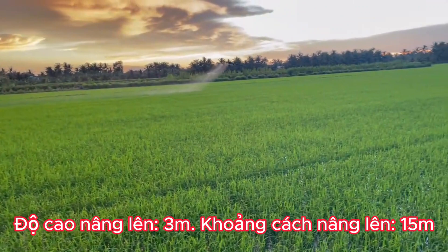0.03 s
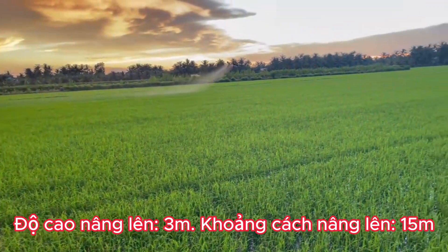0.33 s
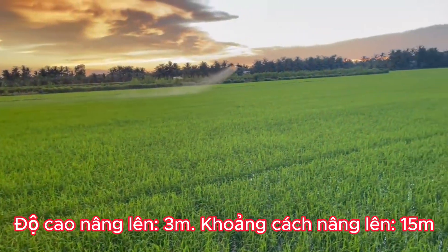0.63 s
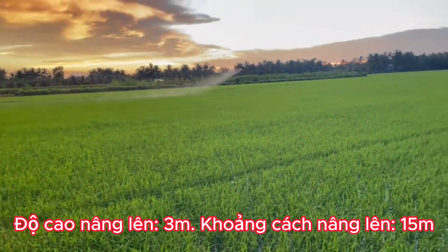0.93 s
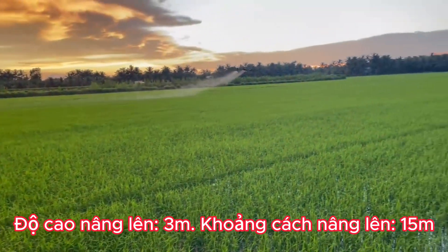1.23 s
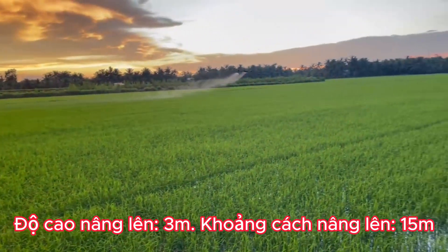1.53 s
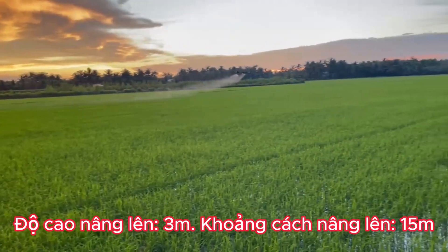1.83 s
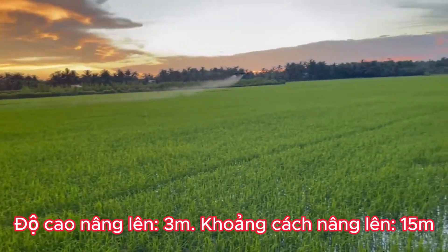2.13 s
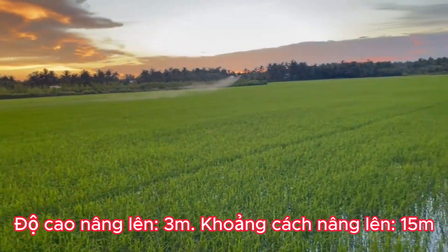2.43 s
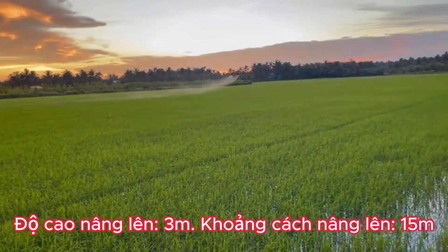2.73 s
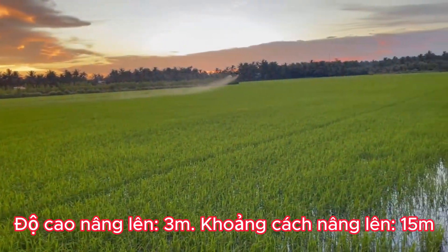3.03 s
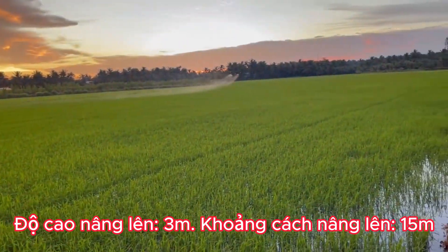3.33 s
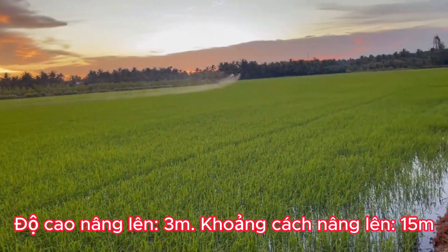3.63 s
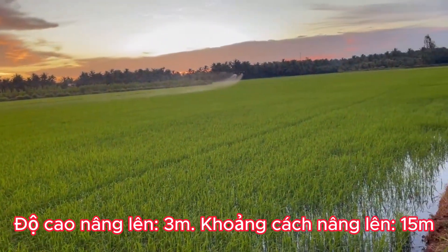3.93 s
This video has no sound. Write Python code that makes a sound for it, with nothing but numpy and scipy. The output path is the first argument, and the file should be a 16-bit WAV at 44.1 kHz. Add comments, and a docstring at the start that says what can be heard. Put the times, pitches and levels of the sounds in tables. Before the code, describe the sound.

A large crop-spraying drone buzzes throughout the four seconds, heard from a distance over an open field. Its rotors thrum and chop, beating against each other above a low air rumble, thin hiss and very faint motor whine. Small blade slaps cluster in the first second and again around three seconds. The pitch sags slightly between about half a second and two seconds, then wavers as the buzz eases a little.

```python
"""A thrumming, chopping buzz: a large crop-spraying drone works far out over a wet rice field,
easing off as it moves away. The leading rotor pulses and tears the air once per blade pass,
and now and then slaps through a tip vortex; slower rotors beat against it.
The field's reflection combs the swish and slaps. Behind them sit a low rumble of downwash,
a thin hiss and a faint motor whine."""
import sys
import numpy as np
from scipy.fft import rfft, irfft, next_fast_len
from scipy.io import wavfile
from scipy.ndimage import map_coordinates

SR = 44100
rng = np.random.default_rng(int(sys.argv[2]) if len(sys.argv) > 2 else 0)


def int16_out(signal):
    """Quantize to a 16-bit WAV file."""
    q = np.round(np.clip(np.atleast_2d(signal).T, -1, 1) * 32767)
    wavfile.write(sys.argv[1], SR, q.astype(np.int16))


N = 176400

# speed of the leading rotor (time [s], blade rate [Hz])
LEAD_SPEED = [(0.0, 56.08), (0.3, 58.0), (0.55, 57.41), (0.8, 55.82), (1.1, 54.85), (1.4, 53.11),
              (1.65, 51.57), (1.9, 51.07), (2.1, 52.91), (2.3, 50.83), (2.55, 52.52), (2.85, 50.83),
              (3.05, 52.58), (3.2, 54.01), (3.45, 51.27), (3.7, 52.74), (4.0, 52.38)]
# faders for the thrum (time [s], body [relative dB], overtones [relative dB])
THRUM_FADERS = [(0.0, -54, -38.5), (0.2, -37, -37), (0.5, -32.5, -33.5), (0.7, -34.5, -34), (1.1, -32, -38),
                (1.25, -39, -38), (1.48, -29.5, -40), (1.8, -35.5, -42.5), (2.05, -41, -45),
                (2.25, -34, -44), (2.5, -37.5, -43), (2.9, -31.5, -42.5), (3.2, -36.5, -43),
                (3.38, -36.5, -42), (3.55, -32.5, -44), (3.8, -41, -43.5), (4.0, -29.5, -39.5)]
# body of the thrum, its lowest overtone and its top (harmonic [x blade rate], level [relative dB])
BODY_HARMONICS = [(1, -23), (2, 0)]
THIRD_HARMONIC = [(3, -8)]
TOP_HARMONICS = [(6, -14), (7, -19), (8, -20.5)]
# rides on the middle harmonics (time [s], fourth [relative dB], fifth [relative dB])
MIDDLE_FADERS = [(0, -4, -7), (.5, -22, -8), (1, -2.5, -7.5), (1.5, -1.5, -3.5), (2.1, -6.5, -7.5),
                 (2.8, -4.5, -12), (3.3, -6.5, -6), (4, -1.5, -10)]
def lead_thrum():
    """A pressure pulse follows each blade of the leading rotor; it dulls and blurs with distance."""
    body_db, overtone_db = curves(THRUM_FADERS)
    fourth_db, fifth_db = curves(MIDDLE_FADERS)
    passes = blade_passes(LEAD_SPEED) - .15
    t = np.arange(N) / SR
    smear = .2 + .14 * t
    third = harmonics(passes, THIRD_HARMONIC, flutter_db=6, smear=smear, rate=13)
    fourth = amp(fourth_db) * harmonics(passes, [(4, 0)], flutter_db=1.5, smear=smear, rate=9)
    fifth = amp(fifth_db) * harmonics(passes, [(5, 0)], flutter_db=2.5, smear=smear, rate=12)
    top = harmonics(passes, TOP_HARMONICS, flutter_db=4, smear=1.47 * smear, rate=20)
    top *= amp(-t)  # sinks 1 dB a second against the other overtones
    body = harmonics(passes, BODY_HARMONICS, flutter_db=1.5, smear=.31, rate=20)
    return amp(body_db - 3) * body + amp(overtone_db - 4) * (third + fourth + fifth + top)


# faders for the swish (time [s], chop and rasp [relative dB], fizz [relative dB])
SWISH_FADERS = [(0.0, -40, -44), (0.35, -39, -43), (0.65, -40, -44), (0.85, -43.5, -44), (1.0, -40.5, -46),
                (1.3, -46, -45), (1.5, -42, -44.5), (1.8, -42.5, -43.3), (1.95, -41.5, -45),
                (2.38, -45, -45.5), (2.52, -42, -46), (2.68, -43.5, -47.5), (2.85, -42.5, -45),
                (3.04, -45, -49.5), (3.18, -39.5, -45.5), (3.35, -44, -48), (3.8, -44.5, -46),
                (4.0, -42.5, -45.5)]
# EQ of the midrange chop and the brighter fizz (frequency [Hz], gain [dB])
CHOP_EQ = [(200, -17), (400, -0.5), (600, -4.5), (780, 5), (1300, 0), (1490, -11.5), (1700, -2.5),
           (1980, -3), (2130, -16.5), (2420, -0.5), (2650, -4.5), (2850, -18), (3100, -10), (3400, -14),
           (4100, -11.5), (6000, -37.5), (10000, -21.5), (16000, -68)]
FIZZ_EQ = [(600, -24), (1480, 0), (1700, 4.5), (1980, -2), (2130, -2), (2380, 4.5), (2620, 1.5), (2850, 0),
           (3080, 4), (3420, 1.5), (3950, 1.5), (4600, -5.5), (5100, 0), (5600, -11), (6200, -4),
           (8000, -24), (12000, -23.5), (16000, -68)]
def blade_swish():
    """The advancing blade rasps and air tears off it in a chop, with a softer fizz on top."""
    chop_db, fizz_db = curves(SWISH_FADERS)
    passes = blade_passes(LEAD_SPEED)
    chop = stereo_noise(CHOP_EQ, strokes(passes, rise=.32, fall=.32, floor=.33, scatter_db=1.6))
    fizz = stereo_noise(FIZZ_EQ, strokes(passes, rise=.23, fall=.18, floor=1.1, scatter_db=3.5))
    rasp = blade_rasp(passes)
    return amp(chop_db - 5) * chop + amp(fizz_db - 4) * fizz + amp(chop_db - 6.3) * rasp


def blade_rasp(passes, eddies=7, spread_passes=.155, cutoff_hz=3600):
    """Each blade meets the same drifting eddies: a bunch of spikes that repeats as a buzz."""
    spikes = np.zeros(N)
    for k, place in enumerate(np.linspace(-1.4, 1.4, eddies)):
        offset = spread_passes * (place + .4 * wobble(4))
        hits = np.diff(np.floor(passes + offset), prepend=0) > 0
        weight = (-1) ** k * np.exp(-place ** 2 / 2)
        spikes += weight * amp(2.1 * wobble(15)) * hits
    return unit(filtered(spikes, lambda hz: amp(along(CHOP_EQ, hz)) / np.hypot(1, (hz / cutoff_hz) ** 2)))


# cue list of slaps (time [s], knock [relative dB], snap [relative dB])
SLAP_CUES = [(0.069, -27.5, -48), (0.0845, -30, -49), (0.1405, -34, -59), (0.176, -26.5, -50),
             (0.2273, -34, -41), (0.332, -35, -38.5), (0.3477, -32, -38), (0.503, -37, -42),
             (0.5753, -31, -46), (0.5905, -33, -40), (0.6613, -31.5, -42), (0.6967, -30, -47),
             (0.9666, -29.5, -42), (1.0944, -27.5, -42), (1.3876, -35, -45), (1.503, -44, -50),
             (2.2957, -30, -58), (2.5072, -36, -41.5), (2.7393, -35, -53), (2.8727, -31, -48),
             (2.971, -43, -44.5), (3.088, -44, -46), (3.1453, -39, -41), (3.160, -30, -51),
             (3.179, -42, -50), (3.2325, -34, -44), (3.2504, -35, -48), (3.960, -35, -42),
             (3.980, -53, -39.5)]
# hollow EQ of the knock (frequency [Hz], gain [dB])
KNOCK_EQ = [(100, -4), (400, -14), (800, 18.5), (1200, 9.5), (1500, -7), (2600, -10), (5000, -9),
            (8000, -43)]
def blade_slaps(snap_s=.0025):
    """Now and then a blade cuts a tip vortex: a hollow knock and a bright snap."""
    t = np.arange(N) / SR
    impulses, snap_gate = np.zeros((2, N))
    for time, knock_db, snap_db in SLAP_CUES:
        impulses[int(time * SR)] = -amp(knock_db + 15.5)
        snap_gate += amp(snap_db) * np.exp(-((t - time) / snap_s) ** 2)
    knocks = filtered(impulses, lambda hz: amp(along(KNOCK_EQ, hz)))
    return knocks + snap_gate * stereo_noise(FIZZ_EQ)


# speeds of the two slower rotors (time [s], blade rate [Hz])
SECOND_SPEED = [(0, 51.6), (.7, 50.2), (1.2, 43), (1.8, 40.4), (2.6, 37), (3.2, 45), (4, 45.3)]
THIRD_SPEED = [(0, 32.74), (1, 32.16), (1.8, 35), (2.3, 43), (2.9, 43.83), (3.4, 34.19), (4, 31.77)]
# timbre of their hum (harmonic [x blade rate], level [relative dB])
HUM_HARMONICS = [(2, -0.5), (3, -5.5), (4, -8), (5, -12), (6, -17.5), (7, -15), (8, -17.5)]
# their shared fader (time [s], level [relative dB])
HUM_FADER = [(0, -40.5), (.6, -38), (1.2, -49.5), (1.9, -43), (2.6, -40), (3.2, -42), (4, -47.5)]
def slow_rotors():
    """Two other rotors hum lower and beat against the leader."""
    second = harmonics(blade_passes(SECOND_SPEED), HUM_HARMONICS, flutter_db=2.5, smear=.82, rate=7)
    third = harmonics(blade_passes(THIRD_SPEED), HUM_HARMONICS, flutter_db=.5, smear=.35, rate=8.1)
    return amp(curves(HUM_FADER)[0]) * (amp(-2) * second + amp(-8) * third)


# bounce off the field (time [s], delay [ms], gain [x direct sound])
FIELD_BOUNCE = [(0, 0.93, 0.36), (.35, 0.89, 0.33), (.55, 0.88, 0.42), (1.4, 0.9, 0.29), (1.75, 0.87, 0.44),
                (2.5, 0.77, 0.33), (3, 0.713, 0.6), (3.4, 0.69, 0.67), (4, 0.67, 0.54)]
def field_reflection(direct):
    """The wet field adds a copy whose delay shrinks with distance: a slowly sweeping comb."""
    n = np.arange(N)
    delay_ms, gain = curves(FIELD_BOUNCE)
    bounce = np.array([np.interp(n - delay_ms * SR / 1000, n, channel) for channel in direct])
    return (direct + gain * bounce) / np.hypot(1, gain)


# faders for the air bed (time [s], rumble [relative dB], hiss [relative dB])
AIR_FADERS = [(0.0, -38.5, -59), (0.4, -37.5, -60.5), (0.9, -39, -63), (1.3, -40.5, -63.5), (1.8, -40, -64),
              (2.6, -44, -66), (3.3, -43, -68), (3.7, -42.5, -65.5), (4.0, -41, -63.5)]
# EQ of the rumble and the hiss (frequency [Hz], gain [dB])
RUMBLE_EQ = [(20, -51), (30, -26), (38, -22), (46, 1), (70, 1), (100, -5), (135, -9.5), (220, -13.5),
             (350, -18), (500, -21.5), (1000, -31), (2000, -64)]
HISS_EQ = [(3000, -5), (6500, 1), (7500, 2), (9000, 4), (9900, 3), (10700, -1), (11800, 1), (13000, 0),
           (13900, 0), (14800, -9), (15700, -18)]
def downwash():
    """Air driven down by the rotors rumbles, and their wake hisses with a slight flicker."""
    rumble_db, hiss_db = curves(AIR_FADERS)
    hiss = amp(hiss_db + 3.5 + .9 * wobble(30.34)) * stereo_noise(HISS_EQ)
    rumble = amp(rumble_db + .35 + .38 * wobble(9.3)) * stereo_noise(RUMBLE_EQ)
    return rumble + hiss


# partials of the whine (frequency [Hz], level [dB])
WHINE_PARTIALS = [(9856, -87), (10147, -89), (11873, -87), (13782, -88)]
def motor_whine():
    """The electric motors give a faint, unsteady whine."""
    t = np.arange(N) / SR
    return np.sqrt(2) * sum(amp(db + 2.6 * wobble(4.7)) * np.sin(2 * np.pi * hz * t + 1.4 * wobble(29))
                            for hz, db in WHINE_PARTIALS)


def blade_passes(speed):
    """Running count of a rotor's blade passes."""
    return .13 + np.cumsum(curves(speed)[0]) / SR


def harmonics(passes, levels, flutter_db, smear, rate):
    """Blade harmonics, shaken by turbulent air in level and in phase (smear, in radians)."""
    tone = np.zeros(N)
    for order, db in levels:
        gain = amp(db + flutter_db * wobble(rate))
        tone -= gain * np.cos(2 * np.pi * order * passes + smear * wobble(rate))
    return np.sqrt(2) * tone


def strokes(passes, rise, fall, floor, scatter_db, jitter=.028):
    """One uneven swell for each blade; rise, fall and jitter are fractions of a pass."""
    blade = np.round(passes).astype(int)
    size, late = rng.standard_normal((512, 2))[blade].T
    from_peak = passes - blade - jitter * late
    width = np.where(from_peak < 0, rise, fall)
    swell = np.exp(-np.abs(from_peak / width) ** 1.4)
    return floor + amp(scatter_db * size) * swell


# stereo image of the noise (frequency [Hz], left-right likeness [0 wide, 1 and above mono])
NOISE_IMAGE = [(50, 1.5), (300, 1.4), (450, 0.25), (600, 0.16), (850, 1), (1500, 0.2), (2500, 0.85),
               (3000, -0.08), (4000, 1), (6000, 0.24), (8500, 1.3), (11000, 3), (12500, 11.4)]
def stereo_noise(eq, gate=1):
    """Gated, coloured mid-side noise, returned as left and right at rms 1."""
    def response(hz):
        width = np.arccos(np.clip(along(NOISE_IMAGE, hz), -1, 1)) / 2
        return amp(along(eq, hz)) * [np.cos(width), np.sin(width)]
    mid, side = filtered(gate * rng.standard_normal((2, N)), response)
    return unit(np.array([mid + side, mid - side]))


def amp(db):
    """Decibels to gain."""
    return 10 ** (np.asarray(db) / 20)


def unit(x):
    """Scale to rms 1."""
    return x / np.sqrt(np.mean(x ** 2) + 1e-20)


def along(points, hz):
    """Read (frequency, value) points on a log frequency axis."""
    freqs, values = np.transpose(points)
    return np.interp(np.log(hz + 1), np.log(freqs + 1), values)


def curves(rows):
    """One automation curve for each column after the time."""
    times, *columns = np.transpose(rows)
    return [np.interp(np.arange(N) / SR, times, column) for column in columns]


def wobble(rate):
    """A smooth random curve, rate knots a second."""
    return map_coordinates(rng.standard_normal(1024), [np.arange(N) * rate / SR], mode="mirror")


def filtered(x, response):
    """Filter x by a complex response of frequency."""
    size = next_fast_len(N + 8192)
    return irfft(rfft(x, size) * response(np.fft.rfftfreq(size, 1 / SR)), size)[..., :N]


def scene():
    """All rotors and their wake, heard across the field."""
    rotors = lead_thrum() + slow_rotors()
    blades = field_reflection(blade_swish() + blade_slaps())
    return rotors + blades + downwash() + motor_whine()


# balance of the microphone ports (frequency [Hz], left over right [dB])
PORT_BALANCE = [(100, 0), (300, .3), (500, 1), (660, 5.5), (900, 1.5), (1350, 5.5), (2000, -1), (2270, 5),
                (2600, -3), (3000, 3.5), (3300, -1), (3750, 4), (4150, -1), (5200, 3), (5800, -2),
                (7000, 3), (8000, 0)]
# phase between the ports (frequency [Hz], left lead [rad])
PORT_PHASE = [(40, .15), (120, .22), (400, .35), (600, 1.1), (720, -.1), (1350, 1.1), (1600, -.8),
              (2050, 1.5), (2250, -1.6), (2850, 1.4), (3100, -.3), (3450, 1.3), (4000, 0), (4400, .9),
              (4750, .1), (5150, 1), (5800, -1.5), (6800, -.3), (7700, -2.9), (9500, -3.3), (9900, -4.1),
              (11000, -4.7), (12500, -6.1)]
def record(dry, top_hz=15700):
    """Two microphone ports differ in level and phase; nothing passes above the band limit."""
    def ports(hz):
        split = np.array([[.5], [-.5]])
        gain = amp(split * along(PORT_BALANCE, hz))
        phase = split * along(PORT_PHASE, hz)
        return gain * np.exp(1j * phase) * (hz < top_hz)
    return filtered(dry, ports)


dry = scene()
out = record(dry)
int16_out(out)
```